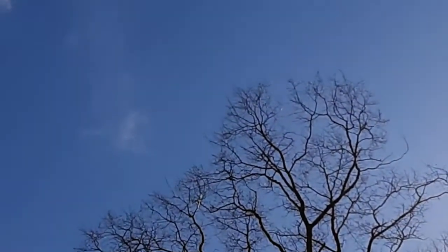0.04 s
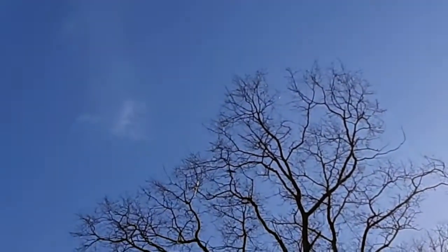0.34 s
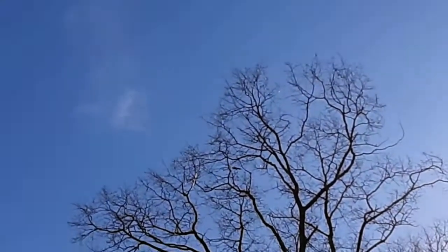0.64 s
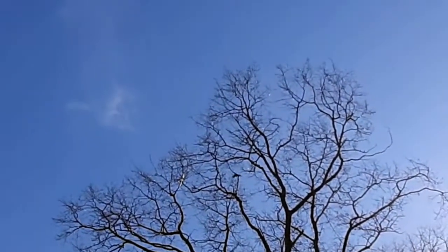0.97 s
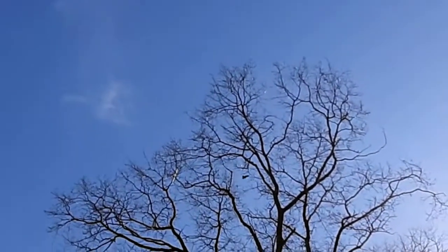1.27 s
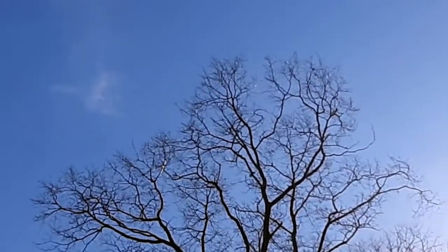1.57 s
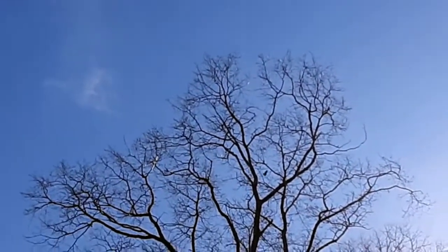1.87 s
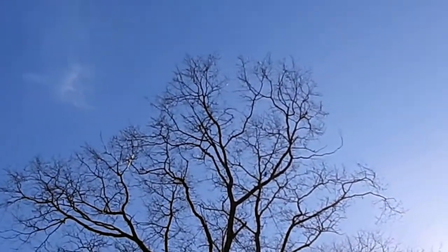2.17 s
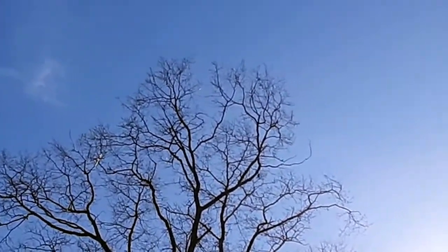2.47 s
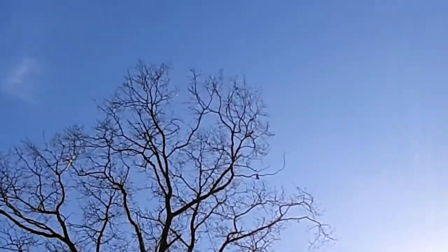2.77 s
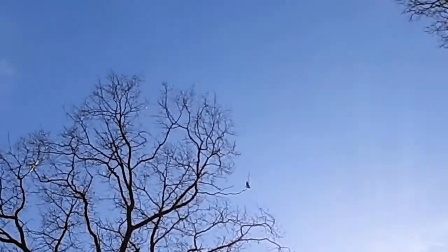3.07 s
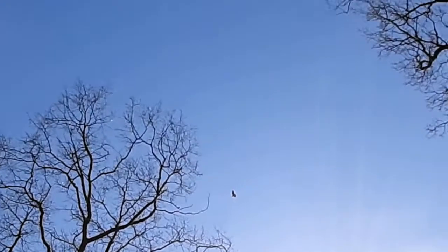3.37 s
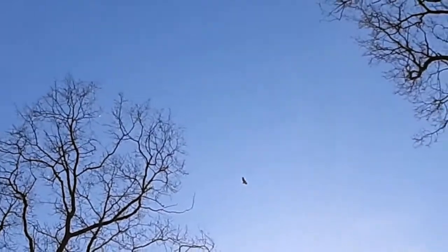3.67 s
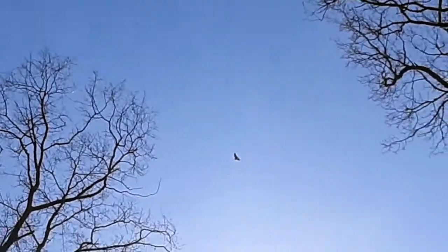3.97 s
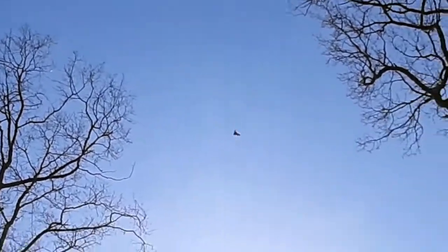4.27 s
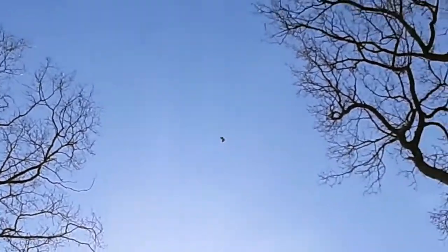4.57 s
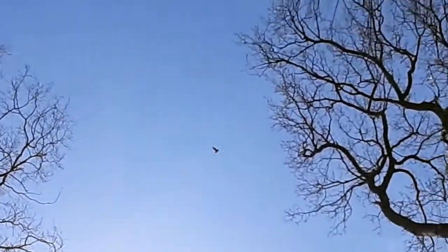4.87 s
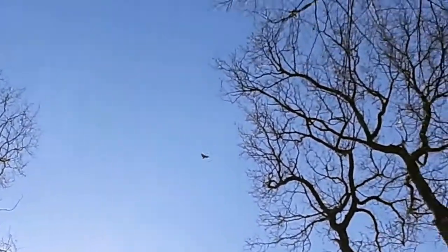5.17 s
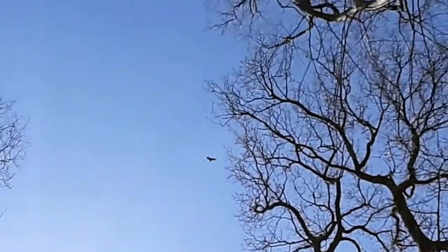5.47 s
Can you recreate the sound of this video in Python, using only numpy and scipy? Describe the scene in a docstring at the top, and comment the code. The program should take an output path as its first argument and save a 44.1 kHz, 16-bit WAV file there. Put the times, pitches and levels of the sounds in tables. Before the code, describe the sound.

A bird of prey circling above the trees calls once near the middle, a loud, slightly raspy cry that rises quickly, falls in pitch and echoes briefly. Before and after it, distant birds twitter, whistle and hoot quietly over a faint outdoor hiss. Low wind buffets the hand-held microphone, mostly at the start and the end, with slight dull handling noises.

```python
"""A wood, heard from a hand-held camera. Over a faint hiss, wind eddies buffet the two microphone
ports; a sleeve rubs the case and fingers bump it. Distant birds whistle and hoot among their echoes.
At 2.6 s a circling bird of prey gives one long mew that leaps up and slides down: a harmonic tone
through throat resonances, raspy where weak. Trunks scatter it into a soft tail."""
import sys
import numpy as np
from scipy import signal
from scipy.fft import rfft, irfft
from scipy.io import wavfile
from scipy.ndimage import uniform_filter1d, map_coordinates

SR = 44100
rng = np.random.default_rng(int(sys.argv[2]) if len(sys.argv) > 2 else 0)


def int16_out(signal):
    """Quantize to a 16-bit WAV file."""
    q = np.round(np.clip(np.atleast_2d(signal).T, -1, 1) * 32767)
    wavfile.write(sys.argv[1], SR, q.astype(np.int16))


N = 252693
TIME = np.arange(N) / SR

# still air and microphone hiss: f/Hz, gain/dB
AIR_SPECTRUM = [(30, -11), (70, -27.5), (150, -12.5), (300, -4.5), (450, -4), (700, -8.5), (1200, -13.5),
                (1550, -12.5), (2200, -16.5), (4000, -17), (7000, -24.5), (9500, -25.5), (12500, -17),
                (15500, -14)]
# breeze, moving from right port to left: t/s, left/dB, right/dB
BREEZE_LEVELS = [(0, -88, -52), (.8, -72, -47.5), (1.3, -89, -48.5), (1.6, -80, -58.5), (2.1, -92, -54),
                 (2.35, -74, -67), (2.7, -67, -82), (3.3, -67.5, -95.5), (3.75, -67.5, -90),
                 (3.98, -75, -104), (4.2, -66.5, -93), (4.7, -69, -99), (5.15, -66, -104), (5.73, -56, -82)]
# gusts: peak t/s, length/s, level/dB, L-R/dB
WIND_GUSTS = [(0.043, .06, -49.5, -37), (0.202, 0.041, -43, -12), (0.391, 0.093, -45.5, -18),
              (0.622, 0.049, -40.5, -27), (0.673, 0.033, -49, 6), (0.792, .13, -41.5, 4),
              (0.869, .06, -45, -8), (1.023, 0.015, -44, -2), (1.156, .06, -47, -37),
              (1.315, 0.043, -51, -40), (1.768, 0.035, -51.5, -37), (2.142, 0.029, -52, -26),
              (2.956, .07, -53, -2), (3.568, 0.055, -60, 36), (3.654, 0.095, -60.5, 32),
              (4.13, 0.089, -62.5, 23), (4.296, 0.13, -67.5, 28), (4.535, 0.049, -63, 30),
              (5.239, 0.072, -47.5, 9), (5.41, 0.063, -55, 12), (5.688, 0.14, -53.5, 15)]
# large eddies at a port: f/Hz, gain/dB
LARGE_EDDY_SPECTRUM = [(12, -35.5), (25, -20), (42, -1), (62, 4), (85, -1), (125, -11.5), (175, -20.5),
                       (290, -29.5), (450, -43.5), (900, -74.5), (2000, -110)]
# small eddies: f/Hz, gain/dB
SMALL_EDDY_SPECTRUM = [(60, -26.5), (110, 1.5), (170, -11), (280, -16.5), (500, -41), (1200, -67.5),
                       (3000, -100)]
# sleeve on the camera: t/s, length/s, level/dB, L-R/dB
SLEEVE_STROKES = [(.01, 0.031, -67.5, 13), (0.157, 0.3, -64.5, 11), (0.453, 0.15, -60, 18),
                  (.76, .22, -78, 16), (1.13, 0.29, -63.5, 19), (2, 0.049, -68.5, 13),
                  (3.276, 0.458, -65.5, -15), (4.124, 0.12, -60.5, -15), (4.466, 0.046, -73, -17)]
# camera case resonance: f/Hz, gain/dB
CASE_SPECTRUM = [(150, -72), (250, -17), (320, 10.5), (430, 5.5), (560, -6), (800, -24.5), (1500, -31),
                 (3000, -71)]
# fingers on the case: t/s, level/dB, L-R/dB
FINGER_BUMPS = [(0.281, -47, 28), (.475, -50, 22), (0.566, -50, 24), (1.368, -44.5, 20),
                (3.519, -50.5, -15), (3.751, -54, -25), (4.165, -52, -13), (4.202, -54, -26),
                (4.232, -53, -27)]
# larger birds, far off: t/s, length/s, f/Hz, level/dB
FAR_HOOTS = [(0.104, .22, 1553, -82), (0.797, 0.33, 1560, -77.5), (1.5, 0.17, 472, -71),
             (2.0, 0.41, 496.4, -72.5), (2.556, 0.18, 453.6, -70), (4.45, 0.2, 443, -72.5),
             (5.001, 0.19, 1540, -73.5)]
# one far bird's repeated falling phrase: t/s, length/s, level/dB
FALLING_PHRASES = [(.11, 0.27, -69), (0.698, .3, -66), (1.417, 0.24, -69), (4.971, .24, -67.5),
                   (5.567, 0.21, -62)]
# its two notes: start/phrase, length/phrase, start f/Hz, end f/Hz, level/dB
PHRASE_NOTES = [(0, 0.524, 3459, 3299, 0.5), (.36, .68, 3264, 2534, -3)]
# small birds: t/s, length/s, start f/Hz, end f/Hz, level/dB
SMALL_CHIRPS = [(.981, 0.063, 5200, 4510, -68), (1.081, .13, 4220, 4230, -63),
                (1.188, 0.069, 4250, 3980, -69), (1.33, 0.078, 3620, 3950, -60.5),
                (1.43, 0.0616, 3800, 4210, -65), (1.51, 0.055, 4200, 3760, -70),
                (1.618, .055, 3850, 4030, -68), (1.729, 0.11, 3950, 3820, -67),
                (1.86, 0.13, 3950, 4400, -73), (2.108, .07, 4600, 4310, -71),
                (2.198, 0.044, 5550, 4550, -66), (2.207, 0.054, 4300, 4290, -68),
                (2.34, 0.032, 4400, 3850, -70), (3.203, 0.057, 4050, 4020, -69.5),
                (4.682, 0.068, 4750, 5130, -75), (4.757, 0.031, 4000, 3450, -66),
                (4.92, 0.064, 6200, 5730, -76.5), (5.175, 0.022, 3500, 3890, -70)]
# mew fundamental: t/s, f/Hz
MEW_PITCH = [(2.615, 904.7), (2.633, 1097), (2.659, 1344), (2.689, 1402), (2.741, 1399), (2.819, 1319),
             (2.875, 1204), (2.939, 1209), (2.961, 1148), (3.039, 1102), (3.171, 903), (3.185, 829),
             (3.205, 799)]
# mew, two swells: t/s, level/dB
MEW_LEVEL = [(2.6, -58), (2.635, -47.5), (2.7, -32.5), (2.745, -34.5), (2.8, -36.5), (2.865, -46.5),
             (2.906, -37), (3.019, -47), (3.11, -54), (3.19, -58)]
# throat and open beak resonances: f/Hz, gain/dB
THROAT_SPECTRUM = [(700, -26), (1000, -22), (1200, -25.5), (1400, -25), (1800, -6), (2000, 1.5),
                   (2250, 2.5), (2850, -4), (3200, -16), (3650, -13), (4150, -13), (4800, -26), (5650, -15),
                   (6400, -40.5), (9000, -40.5)]
# raptor's direction: t/s, L-R/dB, left lag/ms
RAPTOR_BEARING = [(2.6, 0.5, 0.035), (2.8, -2, 0.041), (2.92, -1, 0.053), (3.15, -0.5, -0.092)]
# transmission between the trees: f/Hz, gain/dB
WOOD_SPECTRUM = [(1300, 1.5), (1950, 0.5), (2250, 4.5), (2500, 3), (2850, -1.5), (4200, 10.5), (5600, 6.5)]

MEW_START_S, MEW_END_S = MEW_LEVEL[0][0], MEW_LEVEL[-1][0]


def undb(db):
    """Decibels to gain."""
    return 10 ** (np.asarray(db) / 20)


def curves(table):
    """Columns of a time table, linearly interpolated."""
    times_s, *columns = np.transpose(table)
    return [np.interp(TIME, times_s, column) for column in columns]


def gain_at(hz, spectrum):
    """Spectrum gain, interpolated over log frequency."""
    points_hz, db = np.transpose(spectrum)
    return undb(np.interp(np.log(hz + 1e-9), np.log(points_hz), db))


def unit(x):
    """Scale to rms 1."""
    return x / np.sqrt(np.mean(x ** 2))


def filtered(x, spectrum):
    """Zero-phase filter."""
    return irfft(rfft(x) * gain_at(np.fft.rfftfreq(N, 1 / SR), spectrum), N)


def colour(x, spectrum):
    """Filter, then scale to rms 1."""
    return unit(filtered(x, spectrum))


def walk(rate_hz):
    """Smooth random motion, rms 1."""
    width = max(int(SR / rate_hz), 1)
    smoothed = uniform_filter1d(rng.standard_normal(N), width, mode="wrap")
    return unit(uniform_filter1d(smoothed, width, mode="wrap"))


def pan(side_db):
    """Left and right gains, mean 1."""
    gains = undb(np.array([side_db, -side_db]) / 2).reshape(2, -1)
    return gains / gains.mean(axis=0)


def held(start_s, end_s, attack_s, release_s):
    """Linear rise, hold, exponential decay."""
    return np.clip((TIME - start_s) / attack_s, 0, 1) * np.exp(-np.maximum(TIME - end_s, 0) / release_s)


def air(level_db=-67, shared_db=-9):
    """Still air and microphone hiss, partly common to both ports."""
    hush = rng.standard_normal((2, N)) + undb(shared_db) * rng.standard_normal(N)
    return undb(level_db) * colour(hush, AIR_SPECTRUM)


def wind(puff_db=3, full_gust_db=-24):
    """Eddies buffet each port separately; stronger gusts reach higher in frequency."""
    puffs_db = puff_db * np.array([walk(22), walk(33)])
    power = undb(np.array(curves(BREEZE_LEVELS)) + puffs_db) ** 2
    for peak_s, length_s, db, side_db in WIND_GUSTS:
        bell = np.exp(-(2 * (TIME - peak_s) / length_s) ** 2)
        power += (undb(db) * pan(side_db) * bell) ** 2
    strength = np.sqrt(power)
    large = colour(rng.standard_normal((2, N)), LARGE_EDDY_SPECTRUM)
    large /= np.sqrt(uniform_filter1d(large ** 2, size=3000, axis=1))  # flatten the envelope
    small = colour(rng.standard_normal((2, N)), SMALL_EDDY_SPECTRUM)
    return strength * (large + small * np.sqrt(strength / undb(full_gust_db)))


def sleeve(grip_db=3):
    """Cloth catches and slips on the case, which hums dully."""
    rubbing = sum(undb(db) * pan(side_db) * held(t_s, t_s + length_s, attack_s=.012, release_s=.026)
                  for t_s, length_s, db, side_db in SLEEVE_STROKES)
    slips = rng.standard_normal((2, N)) * undb(grip_db * walk(120))
    return colour(slips, CASE_SPECTRUM) * rubbing


def whistles(notes, arch, warble, warble_ref_hz=4000):
    """Swelling sine notes; pitch arches mid-note and warbles, more so on high notes."""
    song, waver = np.zeros(N), warble * walk(230)
    for start_s, length_s, from_hz, to_hz, db in notes:
        on = (TIME > start_s) & (TIME < start_s + length_s)
        progress = (TIME[on] - start_s) / length_s
        swell = np.sin(np.pi * progress)
        trill = waver[on] * from_hz / warble_ref_hz
        hz = (from_hz + (to_hz - from_hz) * progress) * (1 + arch * swell + trill)
        song[on] += undb(db) * swell * np.sin(2 * np.pi * np.cumsum(hz) / SR)
    return song


def forest(x, t60_s, treble_t60_s, build_s, correlation, split_hz=3000):
    """Stereo scatter from many trunks: builds up, then decays in two bands."""
    t = TIME[:2 * SR]
    left, right, shared = rng.standard_normal((3, len(t)))
    echoes = np.sqrt(1 - correlation) * np.array([left, right]) + np.sqrt(correlation) * shared
    low = signal.sosfiltfilt(signal.butter(4, split_hz, fs=SR, output="sos"), echoes)
    low_decay, treble_decay = undb(-60 * t / t60_s), undb(-60 * t / treble_t60_s)
    response = (low * low_decay + (echoes - low) * treble_decay) * (1 - np.exp(-t / build_s))
    response /= np.sqrt(np.sum(low_decay ** 2))
    return signal.fftconvolve(x[None], response, axes=1)[:, :N]


def far_birds(direct_db=-5, echo_db=.5):
    """Hoots and a falling phrase from deep in the wood, blurred by their echoes."""
    falls = [(t_s + offset * length_s, share * length_s, from_hz, to_hz, db + note_db)
             for t_s, length_s, db in FALLING_PHRASES
             for offset, share, from_hz, to_hz, note_db in PHRASE_NOTES]
    hoots = [(t_s, length_s, hz, hz, db) for t_s, length_s, hz, db in FAR_HOOTS]
    song = whistles(falls, arch=.00964, warble=.0185) + whistles(hoots, arch=.01, warble=.21)
    echo = forest(song, t60_s=.6, treble_t60_s=.6, build_s=.005, correlation=.2)
    return undb(direct_db) * song + undb(echo_db) * echo


def fingers(ring_hz=398, rise_s=.00205):
    """Each bump rings the case briefly."""
    bumps = np.zeros((2, N))
    for start_s, db, side_db in FINGER_BUMPS:
        t = np.maximum(TIME - start_s, 0)
        envelope = t / rise_s * np.exp(1 - t / rise_s)
        bumps += undb(db) * pan(side_db) * envelope * np.sin(2 * np.pi * ring_hz * t)
    return bumps


def small_birds(direct_db=-2, echo_db=-3):
    """Twitter from nearer trees, clearer for having less echo."""
    song = whistles(SMALL_CHIRPS, arch=.02, warble=.026)
    echo = forest(song, t60_s=.4, treble_t60_s=.65, build_s=.002, correlation=.07)
    return undb(direct_db) * song + undb(echo_db) * echo


def raptor_harmonics(hz, phase, rasp, tilt_db_per_octave=-7):
    """Membrane tone through the throat; uneven beats add noise skirts, stronger on high harmonics."""
    tone = np.zeros(N)
    for k in range(1, 7):
        skirt = walk(600) * np.sin(k * phase) + walk(900) * np.cos(k * phase)
        harmonic = np.sin(k * phase) + .5 * rasp * (k / 2) ** .9 * skirt
        tone += harmonic * gain_at(k * hz, THROAT_SPECTRUM) * undb(tilt_db_per_octave * np.log2(k / 2))
    return tone


def voice_break(hz, phase, start_s=2.78, attack_s=.018, clearing_db_per_s=63):
    """Alternating strong and weak beats add wavering lines between the harmonics, then clear."""
    age_s = np.maximum(TIME - start_s, 0)
    envelope = np.minimum(age_s / attack_s, 1) * undb(-clearing_db_per_s * age_s)
    lines = np.zeros(N)
    for k in (2.5, 3.5, 4.5):
        strength = (k / 4.5) ** 1.5 * .5 * (1 + walk(200))
        lines += strength * np.sin(k * phase) * gain_at(k * hz, THROAT_SPECTRUM)
    return envelope * lines


def raptor(gain_db=2.5, flutter_db=3, breath_db=-10, clear_rasp_db=-35, full_voice_db=-31.5, catch_s=.035):
    """Turbulent breath rings the throat, then the tone catches; rasp grows as the voice weakens."""
    (hz,), (db,) = curves(MEW_PITCH), curves(MEW_LEVEL)
    phase = 2 * np.pi * np.cumsum(hz * (1 + .003 * walk(260))) / SR
    rasp = undb(np.minimum(clear_rasp_db + full_voice_db - db, 0))
    tone = raptor_harmonics(hz, phase, rasp) + voice_break(hz, phase)
    caught = np.clip((TIME - MEW_START_S) / catch_s, 0, 1) ** 2
    breath = colour(rng.standard_normal(N), THROAT_SPECTRUM)
    voice = caught * tone + undb(breath_db) * (rasp + .5 * (1 - caught)) * breath
    attack_s = .0042
    gate = held(MEW_START_S - attack_s, MEW_END_S, attack_s, release_s=.011)
    return voice * undb(db + gain_db + flutter_db * walk(70)) * gate


def at_ports(x, wander_db=1.5):
    """Bearing sets level and delay between the ports; moving air shifts the balance."""
    side_db, lag_ms = curves(RAPTOR_BEARING)
    half_lag = lag_ms / 1000 * SR / 2
    pair = np.array([map_coordinates(x, [np.arange(N) - d], order=3) for d in (half_lag, -half_lag)])
    return pair * pan(side_db + wander_db * walk(40))


def overhead(voice, ground_s=.009, ground_db=-20, trunk_s=.047, trunk_db=-23, wood_db=-18):
    """The flying bird heard directly, off the ground and a near trunk, and from the whole wood."""
    ground = undb(ground_db) * np.interp(TIME - ground_s, TIME, voice)
    trunk = undb(trunk_db) * np.interp(TIME - trunk_s, TIME, voice)
    carried = filtered(voice, WOOD_SPECTRUM)
    middle_s = (MEW_START_S + MEW_END_S) / 2
    tail = np.zeros((2, N))
    for doppler in (-.045, -.025, -.005, .015):  # flat at trees behind the bird, sharp ahead
        shifted = map_coordinates(carried, [(TIME + doppler * (TIME - middle_s)) * SR], order=3)
        tail += forest(shifted, t60_s=1.24, treble_t60_s=.7, build_s=.003, correlation=.44)
    return at_ports(voice + ground + trunk) + undb(wood_db) * tail


def scene():
    """Sum at the two ports."""
    return air() + wind() + sleeve() + far_birds() + fingers() + small_birds() + overhead(raptor())


def record(dry, cutoff_hz=15650):
    """The camera's steep low-pass."""
    return signal.sosfilt(signal.ellip(10, .2, 70, cutoff_hz, fs=SR, output="sos"), dry)


dry = scene()
out = record(dry)
int16_out(out)
```